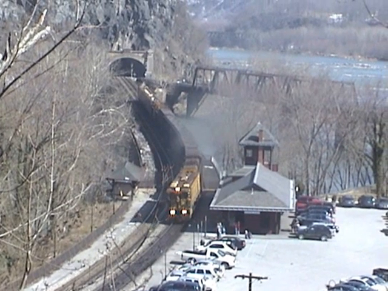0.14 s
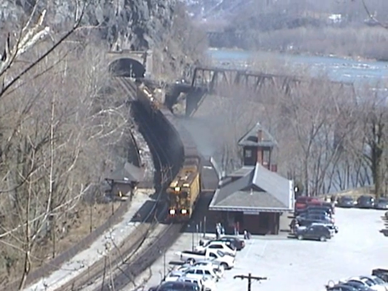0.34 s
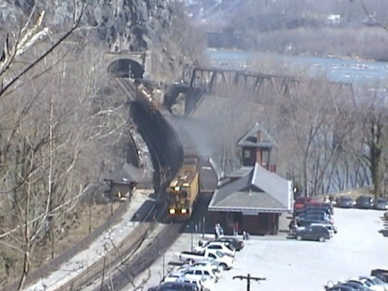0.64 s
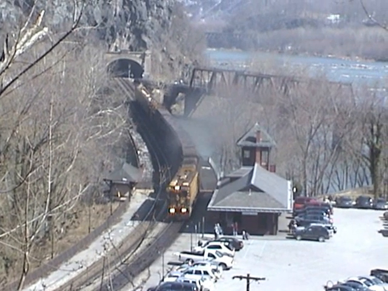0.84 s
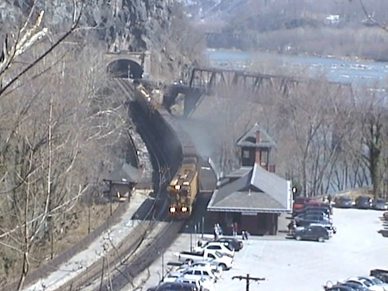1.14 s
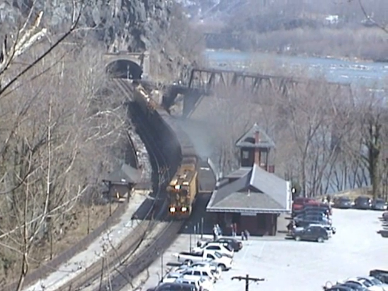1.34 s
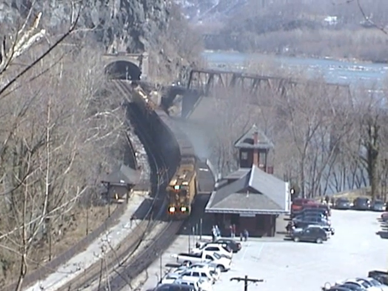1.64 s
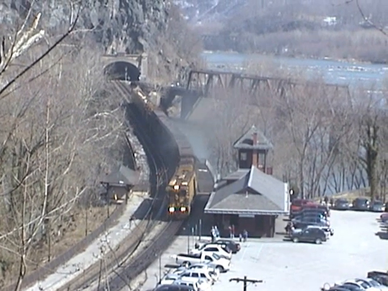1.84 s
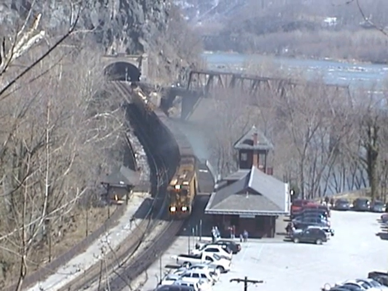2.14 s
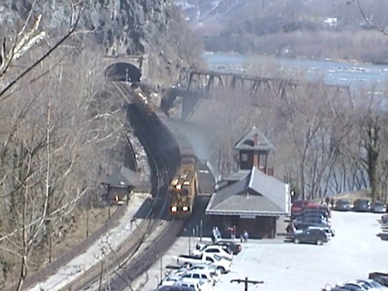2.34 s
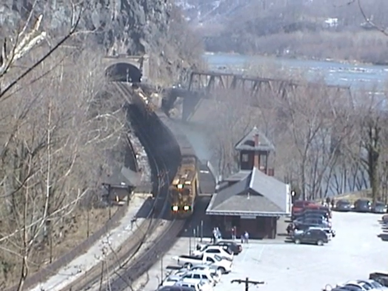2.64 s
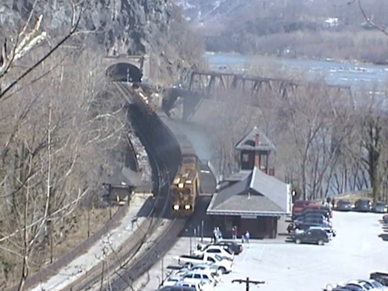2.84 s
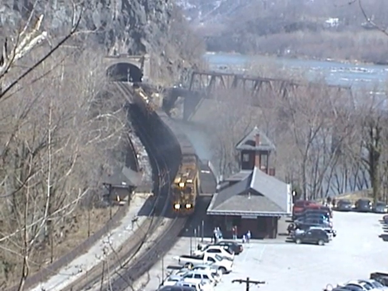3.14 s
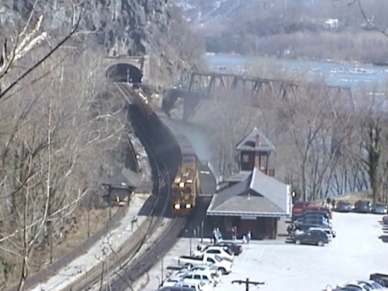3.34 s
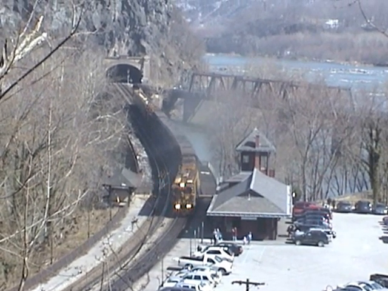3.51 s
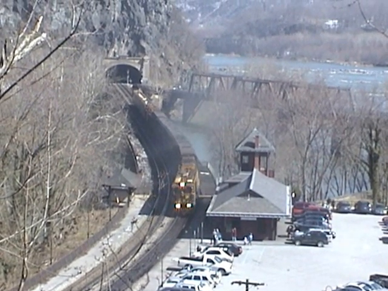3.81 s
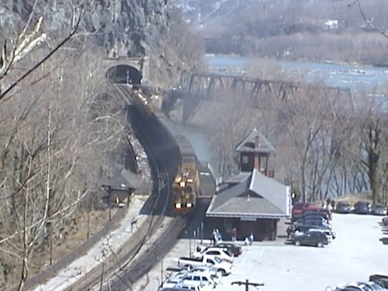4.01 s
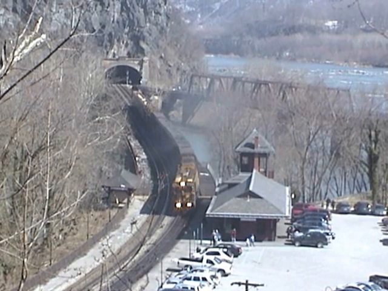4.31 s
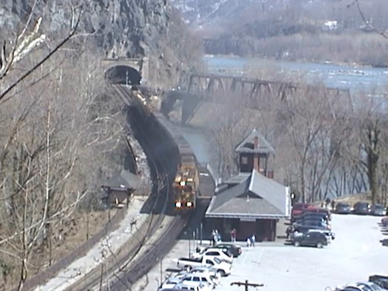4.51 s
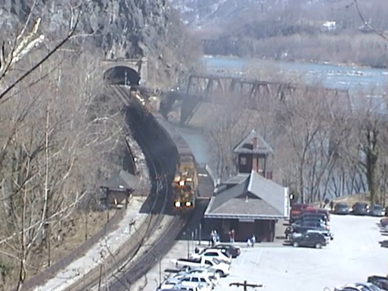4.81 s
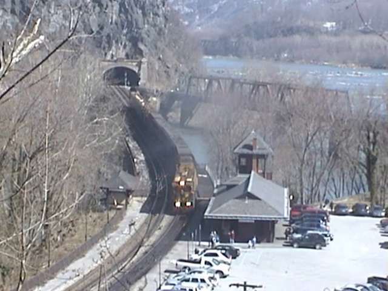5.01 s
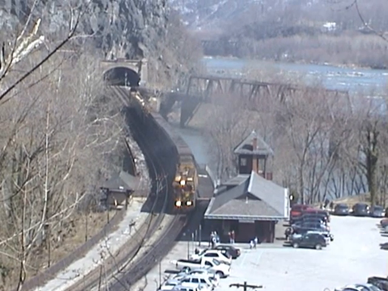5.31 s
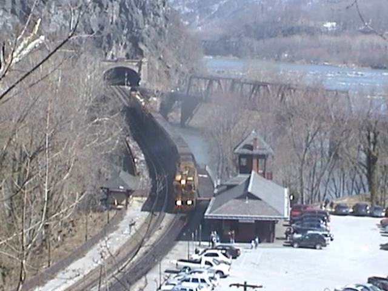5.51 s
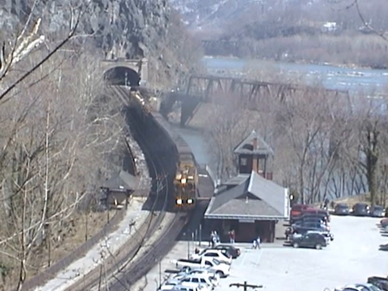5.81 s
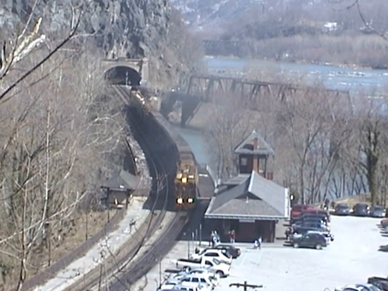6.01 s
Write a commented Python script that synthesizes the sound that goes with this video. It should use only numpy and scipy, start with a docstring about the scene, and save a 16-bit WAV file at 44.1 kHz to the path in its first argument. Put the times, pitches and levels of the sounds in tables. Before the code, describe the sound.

Heard from a hillside above the track, a creeping maintenance train holds a constant low diesel throb and a fluttering two-note blower whine over exhaust roar and rasping wheels. Dull clanks knock now and then. Close to the microphone, dry brush rustles, twigs tick and a faint motor sings. Bird chips come mid-way, and low wind buffeting grows near the end.

```python
"""A rail grinding train creeps towards a station, heard from a hillside far above the track.
Throughout, its diesel throbs at constant speed under the two-note whine of its blower, over exhaust roar,
rolling and rasping wheels, rustling brush and the faint singing of the camera's motor: orders, tones and noise.
Muffled clanks come from the start and dry twigs tick before the first second is out, as short noise bursts.
Gliding bird chips follow from 2.7 s, bright swishes from about 3.4 s, and low buffeting rises after 3.6 s."""
import sys
import numpy as np
from scipy import signal
from scipy.fft import rfft, irfft
from scipy.io import wavfile

SR = 44100
rng = np.random.default_rng(int(sys.argv[2]) if len(sys.argv) > 2 else 0)


def put_to_file(sound):
    """Save the sound as 16-bit audio at rate SR, in the file named by the first command-line argument."""
    columns = np.atleast_2d(sound).T  # one column per channel
    safe = np.clip(columns, -1, 1)
    whole_steps = np.round(safe * 32767)
    wavfile.write(sys.argv[1], SR, whole_steps.astype(np.int16))


N = 271215
TIME = np.arange(N) / SR
CRANK_HZ = 14.843  # revolutions of the diesel per second


def from_db(db):
    """Amplitude ratio: twenty decibels are a factor of ten."""
    return 10 ** (np.asarray(db) / 20)


def rms_one(x):
    """Normalisation to unit mean power."""
    return x / np.sqrt(np.mean(x ** 2) + 1e-20)


def in_time(rows):
    """Linear interpolation of every column of a curve to the sample times."""
    times, *columns = np.transpose(rows)
    return [np.interp(TIME, times, column) for column in columns]


def drift(rate_hz):
    """Random wandering of unit spread: noise under a Gaussian lowpass."""
    count = 2048
    hz = np.fft.rfftfreq(count, TIME[-1] / count)
    smooth = irfft(rfft(rng.standard_normal(count)) * np.exp(-.5 * (hz / rate_hz) ** 2))
    return np.interp(TIME, np.linspace(0, TIME[-1], count), rms_one(smooth))


def noise(gain_at):
    """Spectral shaping: white noise times a gain over frequency, brought to unit power."""
    hz = np.maximum(np.fft.rfftfreq(N, 1 / SR), 1e-3)
    return rms_one(irfft(rfft(rng.standard_normal(N)) * gain_at(hz), N))


def band(centre_hz, width_hz):
    """Narrow-band noise under a Gaussian gain curve."""
    return noise(lambda hz: np.exp(-.5 * ((hz - centre_hz) / width_hz) ** 2))


def wide_noise(spectrum, side_db):
    """Partial coherence: both ears share one noise, and a second enters them with opposite sign."""
    points_hz, level_db = np.transpose(spectrum)

    def gain_at(hz):
        """Decibels interpolated over log frequency."""
        return from_db(np.interp(np.log(hz), np.log(points_hz), level_db))

    mid = noise(gain_at)
    side = noise(gain_at)
    return mid + from_db(side_db) * side * [[1], [-1]]


def tone(hz, scatter, flutter_hz, turn=0):
    """Multipath fading: scattered copies in phase and in quadrature make a tone waver; turn is in cycles."""
    phase = 2 * np.pi * (hz * TIME + turn)
    in_phase = (1 + scatter * drift(flutter_hz)) * np.cos(phase)
    quadrature = scatter * drift(flutter_hz) * np.sin(phase)
    return rms_one(in_phase + quadrature)


def pan(x, left_db):
    """Interaural level difference: left minus right."""
    return x * from_db(np.array([[left_db], [-left_db]]) / 2)


def from_the_right(x):
    """Interaural time difference: sound from the right reaches the left capsule later."""
    lag_s = .000036
    hz = np.fft.rfftfreq(N, 1 / SR)
    late_left = irfft(rfft(x[0]) * np.exp(-2j * np.pi * hz * lag_s), N)
    return np.array([late_left, x[1]])


def camera():
    """Forced vibration: a motor's harmonics excite case resonances, beside steady tones and hiss."""
    # steady motor tones: (frequency [Hz], left level before trim [dB], right level before trim [dB])
    motor_tones = [(2484, -74, -70), (2850, -75, -72), (2904, -70, -68), (3015, -70, -69), (3128, -68, -75),
                   (3241, -70, -73), (3327, -72, -74), (3351, -69, -74), (3575, -73, -80), (3768, -77, -76),
                   (4046, -72, -67), (4156, -71, -71), (4269, -74, -77), (4495, -80, -77), (6019, -85, -73),
                   (6231, -78, -68), (6282, -87, -73), (6333, -75, -69), (6455, -75, -69), (6492, -77, -74),
                   (6506, -80, -72), (6651, -90, -73), (6678, -87, -75), (6810, -83, -72), (6890, -84, -74),
                   (7343, -79, -75), (9741, -79, -83), (9816, -80, -90), (9862, -79, -82),
                   (11165, -83, -87)]
    # case resonances: (frequency [Hz], half width at half gain [Hz], relative gain [dB])
    case_modes = [(3300, 480, -10), (4080, 670, 0.5), (6500, 780, 4.5), (7500, 110, 6), (9850, 130, -9),
                  (11100, 250, -7), (13500, 200, -19)]
    # hiss spectrum: (frequency [Hz], relative density [dB])
    hiss_spectrum = [(1000, -8.5), (4200, 7), (5200, -2), (6500, 1.5), (7100, 5.5), (7450, -5),
                     (7900, -1.5), (9200, -0.5), (9850, -1.5), (10500, -1), (11300, 0.5), (12200, -5.5),
                     (15500, -7)]
    motor_hz, trim_db = 27.03, -0.8

    tones = np.zeros((2, N))
    for hz, left_db, right_db in motor_tones:
        phase = 2 * np.pi * hz * TIME + rng.uniform(0, 2 * np.pi) + 0.45 * drift(6.7)
        gains = from_db([[left_db + trim_db], [right_db + trim_db]])
        # the two capsules receive each tone about a quarter cycle apart
        tones += np.sqrt(2) * gains * np.cos([phase, phase + 1.55])

    def buzz_gain(hz):
        """Resonance: fine lines at multiples of the motor rate, raised by the case."""
        lines = np.cos(np.pi * hz / motor_hz) ** 40
        return lines * sum(from_db(db) / (1 + ((hz - centre) / width) ** 2) for centre, width, db in case_modes)

    buzz = from_db(-66.5) * np.array([noise(buzz_gain) for _ in range(2)])
    hiss = from_db(-64.0) * wide_noise(hiss_spectrum, side_db=5.0)
    return tones + pan(buzz, left_db=-15.0) + pan(hiss, left_db=1.5)


def wind():
    """Turbulent pressure at the microphone: low noise, independent at each ear, that grows late."""
    steady_db, rises_s, rise_db_per_s = -75, 3.6, 9
    level_db = steady_db + rise_db_per_s * np.maximum(TIME - rises_s, 0)
    return from_db(level_db) * np.array([band(39, width_hz=11) for _ in range(2)])


def brush():
    """Broadband friction noise: a breeze stirs dry brush in short swishes."""
    # rustle level before flicker: (time [s], level [dB])
    rustle_level = [(0, -63), (.35, -67), (.5, -63), (1.15, -62), (1.4, -55.5), (1.75, -60), (2.05, -56),
                    (2.42, -60.5), (2.6, -56.5), (2.98, -55), (3.15, -58), (3.48, -53.5), (3.75, -56.5),
                    (3.92, -61), (4.2, -54.5), (4.5, -56.5), (4.7, -63), (4.85, -60), (5.0, -62),
                    (5.15, -58), (5.4, -63), (6.15, -58)]
    # rustle spectrum: (frequency [Hz], relative density [dB])
    rustle_spectrum = [(1000, -34), (3000, 8.5), (4200, 2), (5400, -1.5), (7000, -7), (8500, -8),
                       (15000, -30.5)]
    level_db, = in_time(rustle_level)
    flicker_db = .9 * drift(18)
    rustle = from_db(level_db + flicker_db) * wide_noise(rustle_spectrum, side_db=-10.5)
    return from_the_right(pan(rustle, left_db=0.5))


def swishes():
    """Spectral brightening: brief swells of high noise join the rustle."""
    # brightest swishes: (peak time [s], time to fall to 1/e [s], peak level [dB])
    bright_moments = [(3.46, .1, -65), (4.4, .14, -62), (5.82, .07, -65)]
    swell = sum(from_db(db) * np.exp(-((TIME - peak) / length) ** 2) for peak, length, db in bright_moments)
    return swell * np.array([band(9500, width_hz=4700) for _ in range(2)])


def twigs():
    """Impulsive fracture: snapping fibres give short, jagged bursts, each around its own pitch."""
    # ticks: (start [s], time to fall to 1/e [s], centre frequency [Hz], burst level [dB])
    tick_events = [(.885, .008, 4400, -50), (1.361, .004, 4200, -51), (2.473, .005, 5000, -55),
                   (2.627, .005, 3400, -45.5), (2.664, .005, 3400, -49), (2.731, .006, 2700, -45),
                   (2.756, .007, 5500, -49), (2.760, .045, 2400, -48), (2.775, .006, 4800, -47),
                   (2.784, .007, 5400, -47.5), (2.792, .007, 4000, -47), (2.800, .025, 5500, -56),
                   (2.847, .008, 5800, -49.5), (3.108, .005, 9500, -54), (4.568, .004, 3800, -47),
                   (5.122, .018, 2800, -49), (5.244, .004, 4700, -48)]
    snap_db, snap_hz = 2.5, 120  # depth and speed of the jaggedness
    width_share = .36  # bandwidth over centre frequency
    ticks = np.zeros(N)
    snaps = rms_one(from_db(snap_db * drift(snap_hz)))
    for start, length, centre_hz, db in tick_events:
        burst = (TIME >= start) * np.exp(-((TIME - start) / length) ** 2)
        ticks += from_db(db) * burst * snaps * band(centre_hz, width_hz=width_share * centre_hz)
    return from_the_right(pan(ticks, left_db=1.0))


def bird():
    """Frequency modulation: chips slide to a held pitch, and trees scatter them into a decaying tail."""
    # chips: (start [s], time to fall to 1/e [s], start frequency [Hz], held frequency [Hz], level [dB])
    chip_events = [(2.697, .014, 4950, 5150, -52), (3.216, .06, 8100, 7380, -53.5),
                   (3.585, .07, 7300, 7450, -59), (3.757, .04, 5400, 5450, -61.5),
                   (3.778, .04, 3550, 3620, -54)]
    chips = np.zeros(N)
    for start, length, start_hz, held_hz, db in chip_events:
        age = np.maximum(TIME - start, 0)
        slide_hz = (start_hz - held_hz) * np.exp(-age / 0.0061)
        hz = held_hz + slide_hz + 55 * drift(130)
        swell = np.minimum(age / 0.005, 1) * np.exp(-(age / length) ** 2)
        chips += from_db(db) * swell * np.sin(2 * np.pi * np.cumsum(hz) / SR)

    age = TIME[:SR // 2]
    trees = rng.standard_normal((2, len(age))) * from_db(-60 * age / 0.27)  # 60 dB decay in 0.27 s
    trees = trees / np.linalg.norm(trees[0])
    tail = signal.fftconvolve(chips[None], trees, axes=1)[:, :N]
    return chips + from_db(5.5) * tail


def clanks():
    """Damped impacts: dull knocks of the running gear, each around its own pitch, blurred by distance."""
    # knocks: (start [s], centre frequency [Hz], level before trim [dB])
    knock_events = [(0.268, 1050, -36), (1.829, 1450, -32.5), (1.879, 1280, -35), (1.985, 1000, -34),
                    (2.116, 1050, -32), (2.860, 1350, -35), (3.011, 1020, -33), (4.150, 1370, -36),
                    (4.902, 1800, -39)]
    attack_s, decay_s, trim_db = .003, .014, -2.5
    knocks = np.zeros(N)
    for start, hz, db in knock_events:
        age = np.maximum(TIME - start, 0)
        envelope = np.minimum(age / attack_s, 1) * np.exp(-age / decay_s)
        knocks += from_db(db + trim_db) * envelope * band(hz, width_hz=190)
    return pan(knocks, left_db=2.0)


def rasp():
    """Friction noise: steel grinds on steel in uneven grains, among narrow singing bands that swell and fade."""
    # grinding level before trim: (time [s], level [dB])
    rasp_level = [(0, -42), (.6, -41.5), (1.2, -41.5), (1.5, -41), (2.1, -40.5), (2.6, -41.5), (3.5, -42.5),
                  (4.6, -43.5), (5.3, -43.5), (6.15, -44)]
    # grinding spectrum: (frequency [Hz], relative density [dB])
    rasp_spectrum = [(600, -5.5), (1000, -4), (1230, 2), (1350, 0.5), (1550, -0.5), (1680, -2.5),
                     (1950, -3.5), (2500, -12), (3500, -19.5), (5000, -29), (9000, -51)]
    # narrow singing bands: rail resonances, and at 1425 Hz the blower's fourth harmonic (order 96):
    # (frequency [Hz], width [Hz], peak time [s], time to fall to 1/e [s], peak level [dB])
    singing_bands = [(1425, 10, 1.7, .8, -55), (1570, 30, 2.3, 2.5, -60), (1742, 12, 1.35, .5, -53),
                     (1785, 14, 4.2, .3, -56), (1775, 16, 3, 3, -61), (2010, 25, 1.75, .3, -56),
                     (2110, 18, 2.25, .25, -56)]
    grain_db, grain_hz, trim_db = .9, 70, 0.5
    level_db, = in_time(rasp_level)
    grains = rms_one(from_db(grain_db * drift(grain_hz)))
    grinding = from_db(level_db + trim_db) * grains * wide_noise(rasp_spectrum, side_db=-11.5)
    singing = np.zeros(N)
    for hz, width_hz, peak, length, db in singing_bands:
        swell = np.exp(-((TIME - peak) / length) ** 2)
        singing += from_db(db) * swell * band(hz, width_hz)
    return pan(grinding + singing, left_db=1.2)


def rolling_swing():
    """Level difference: rolling noise relative to its mean, in dB."""
    # rolling noise, of which only the swing is used: (time [s], level [dB])
    rolling_level = [(0, -43), (1.2, -42.5), (1.9, -41), (3.3, -42), (4.8, -44), (5.5, -46), (6.15, -45)]
    level_db, = in_time(rolling_level)
    return level_db - level_db.mean()


def firing():
    """Periodicity of combustion: eight firing pulses a revolution."""
    return np.cos(2 * np.pi * 8 * CRANK_HZ * TIME)


def wheels(swing_db):
    """Rolling noise: wheel roar follows part of the swing, with a pulse at the firing rate."""
    # wheel spectrum: (frequency [Hz], relative density [dB])
    wheel_spectrum = [(200, -23.5), (400, -2.5), (520, -4.5), (650, -0.5), (820, -5), (1050, -11.5),
                      (1500, -40), (3000, -62)]
    mean_db, follows = -35.5, 0.71
    level = from_db(mean_db + follows * swing_db)
    roar = level * (1 + 0.12 * firing()) * wide_noise(wheel_spectrum, side_db=-11.5)
    return pan(roar, left_db=2.0)


def exhaust(swing_db):
    """Amplitude modulation: rushing gas pulses with the firings and chuffs once a revolution."""
    # exhaust spectrum: (frequency [Hz], relative density [dB])
    exhaust_spectrum = [(5, -46.5), (20, -28), (30, -19), (44, -22.5), (60, -3), (95, 2.5), (145, 0),
                        (200, 3.5), (290, 6.5), (380, -4), (520, -7), (1000, -46)]
    mean_db, follows, chuff_depth = -35, 0.43, 0.088
    level = from_db(mean_db + follows * swing_db + 1.0 * drift(26.0))
    chuff = 1 + chuff_depth * np.cos(2 * np.pi * CRANK_HZ * TIME)
    rush = level * chuff * (1 + 0.092 * firing()) * wide_noise(exhaust_spectrum, side_db=-16.5)
    return pan(rush, left_db=3.0)


def skirt(hz):
    """Beating: engines further back sound the same tone slightly faster and smeared."""
    faster_share, spread_share = 0.016, 0.0062  # shares of pitch
    return band(hz * (1 + faster_share), width_hz=hz * spread_share)


def whine(hz, level, skirt_db):
    """Phase modulation: moving air varies the travel time, and the tone flutters against its skirt."""
    air_delay_s, air_wander_hz = .00014, 1.5
    far_follows = 0.23  # share of the tone's fading that the skirt takes on
    level_db, = in_time(level)
    turn = rng.random() + hz * air_delay_s * drift(air_wander_hz)
    front = from_db(level_db) * tone(hz, scatter=0.017, flutter_hz=13, turn=turn)
    far_db = skirt_db + far_follows * (level_db - level_db.mean())
    return front + from_db(far_db) * skirt(hz)


def blower():
    """Periodic flow interruption: lobes chop the intake air into a tone and its octave."""
    # lobe tone, swelling and fading on the way through the air: (time [s], level before trim [dB])
    lobe_level = [(0.0, -26.5), (0.06, -32.0), (0.17, -26.5), (0.31, -41.0), (0.4, -30.0), (0.47, -37.0),
                  (0.72, -27.5), (0.86, -34.0), (0.93, -25.5), (1.19, -26.5), (1.27, -28.0), (1.41, -26.5),
                  (1.61, -24.0), (1.69, -31.5), (1.77, -24.0), (1.83, -30.5), (1.89, -25.0), (2.1, -29.0),
                  (2.32, -28.0), (2.47, -30.5), (2.59, -25.0), (2.65, -30.0), (2.75, -24.5), (2.81, -32.5),
                  (2.88, -25.0), (3.05, -29.0), (3.13, -35.0), (3.37, -26.0), (3.65, -37.5), (3.73, -28.0),
                  (3.82, -34.5), (3.89, -29.0), (3.96, -35.0), (4.05, -29.5), (4.1, -36.0), (4.26, -28.0),
                  (4.64, -33.0), (4.75, -41.0), (5.05, -28.5), (5.17, -33.5), (5.38, -27.5), (5.81, -33.5),
                  (5.87, -28.0), (5.98, -38.5), (6.05, -31.0), (6.14, -39.5)]
    # its octave: (time [s], level before trim [dB])
    octave_level = [(0.0, -31.5), (0.23, -26.0), (0.27, -32.5), (0.32, -27.5), (0.51, -28.5), (0.85, -25.5),
                    (0.9, -30.0), (0.94, -25.5), (1.17, -31.0), (1.22, -28.0), (1.34, -30.0), (1.57, -24.0),
                    (1.7, -28.5), (1.91, -27.5), (1.98, -30.5), (2.11, -25.5), (2.23, -29.5), (2.27, -25.5),
                    (2.32, -31.0), (2.44, -25.0), (2.5, -29.5), (2.58, -24.0), (2.73, -28.0), (2.78, -22.5),
                    (2.86, -27.0), (3.16, -26.5), (3.26, -30.5), (3.32, -25.5), (3.37, -31.5),
                    (3.49, -27.5), (3.67, -32.5), (3.73, -26.5), (3.85, -31.5), (3.91, -26.0),
                    (3.96, -35.0), (4.1, -28.0), (4.21, -40.0), (4.25, -32.5), (4.53, -33.5), (4.63, -37.5),
                    (4.8, -31.0), (4.88, -42.0), (4.92, -28.5), (5.01, -38.5), (5.13, -33.0), (5.26, -37.0),
                    (5.39, -32.0), (5.43, -37.0), (5.59, -34.5), (6.14, -35.0)]
    lobe_hz = 24 * CRANK_HZ
    lobe = from_db(0.13) * whine(lobe_hz, lobe_level, skirt_db=-48.5)
    octave = from_db(0.1) * whine(2 * lobe_hz, octave_level, skirt_db=-44.5)
    return pan(lobe, left_db=4.0) + pan(octave, left_db=2.5)


def diesel():
    """Engine orders: the 7th and 8th beat once a revolution, and weaker ones fill in the drone."""
    # 7th order, fading in and out and sinking late: (time [s], level [dB])
    seventh_level = [(0.0, -28.5), (0.14, -25.5), (0.53, -28.5), (1.08, -26.0), (1.25, -30.0),
                     (1.55, -27.5), (1.77, -29.5), (2.08, -27.5), (2.53, -29.0), (2.81, -27.0),
                     (3.01, -30.0), (3.4, -26.0), (4.13, -29.0), (4.33, -28.0), (4.89, -32.0),
                     (5.19, -29.0), (5.51, -35.0), (5.69, -29.5), (6.03, -34.0), (6.14, -29.0)]
    # 8th order: (time [s], level [dB])
    eighth_level = [(0.0, -26.5), (0.67, -27.0), (0.83, -30.0), (0.96, -26.0), (1.2, -28.5), (1.78, -25.5),
                    (1.91, -27.5), (2.42, -26.0), (2.59, -28.0), (2.7, -26.0), (3.75, -27.0), (4.03, -26.0),
                    (4.14, -28.5), (4.39, -27.0), (5.65, -28.5), (5.8, -25.5), (6.03, -28.5), (6.14, -27.0)]
    # weaker orders: (multiple of the crank rate [1], level before trim [dB])
    weak_orders = [(3.5, -58), (6, -51), (6.5, -49), (9, -47.5), (12, -44), (14, -54), (16, -47), (18, -52),
                   (19, -52), (20, -51), (21, -50), (32, -55), (33.5, -56), (36, -53), (42, -52), (83, -63),
                   (96, -62), (117, -66), (156, -68)]
    seventh_db, = in_time(seventh_level)
    eighth_db, = in_time(eighth_level)
    seventh_hz, eighth_hz = 7 * CRANK_HZ, 8 * CRANK_HZ
    seventh = from_db(seventh_db) * tone(seventh_hz, scatter=0.016, flutter_hz=1.3)
    eighth = from_db(eighth_db) * tone(eighth_hz, scatter=0.057, flutter_hz=4.6)
    far = from_db(-42) * (skirt(seventh_hz) + skirt(eighth_hz))
    rest = np.zeros(N)
    for order, db in weak_orders:
        rest += from_db(db) * tone(order * CRANK_HZ, scatter=0.77, flutter_hz=1.95, turn=rng.random())
    return pan(seventh + eighth + far + from_db(1.2) * rest, left_db=4.1)


def scene():
    """Superposition: the small sounds close by and the distant train add linearly."""
    swing_db = rolling_swing()
    close_by = camera() + wind() + brush() + swishes() + twigs() + bird()
    train = clanks() + rasp() + wheels(swing_db) + exhaust(swing_db) + blower() + diesel()
    return close_by + train


def record(dry):
    """Band limiting: a short fade in, then a steep elliptic lowpass."""
    cutoff_hz, fade_s = 15500, .004
    fade = np.sin(np.pi / 2 * np.minimum(TIME / fade_s, 1)) ** 2
    lowpass = signal.ellip(12, .1, 90, cutoff_hz, fs=SR, output="sos")
    return signal.sosfilt(lowpass, dry * fade)


dry = scene()
out = record(dry)
put_to_file(out)
```